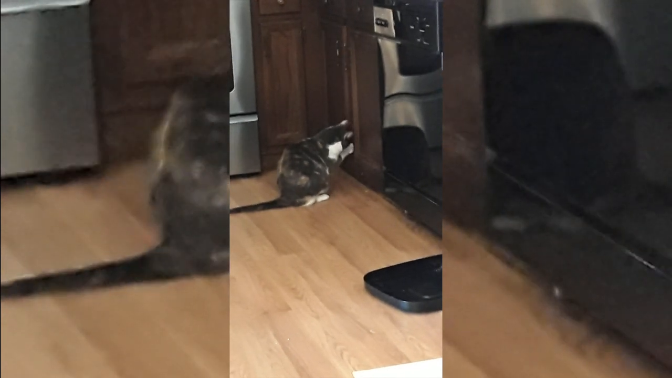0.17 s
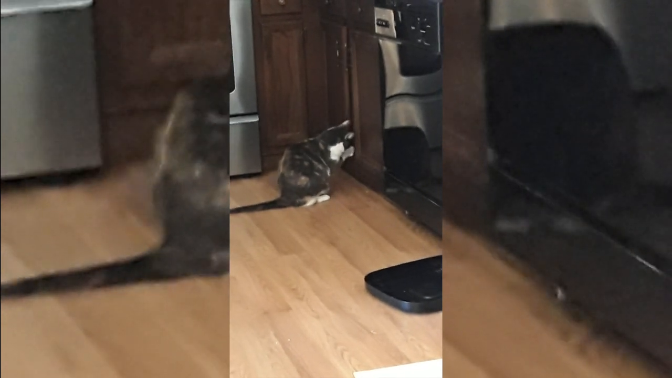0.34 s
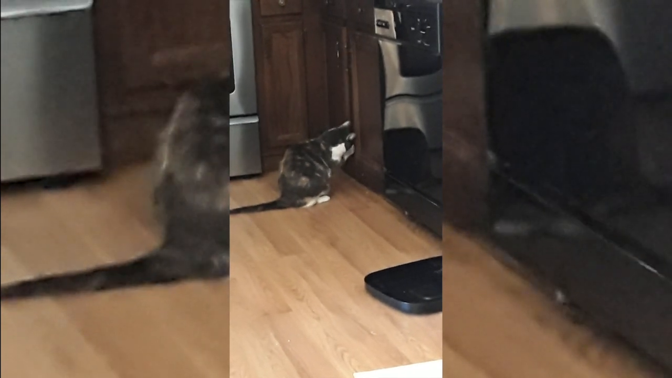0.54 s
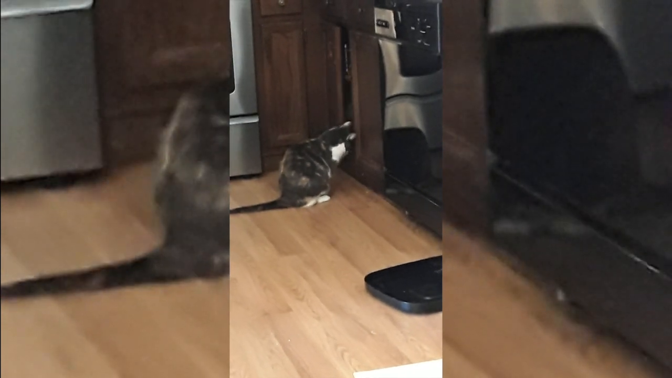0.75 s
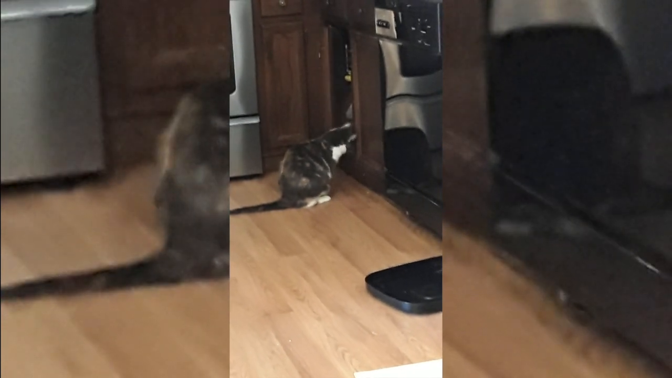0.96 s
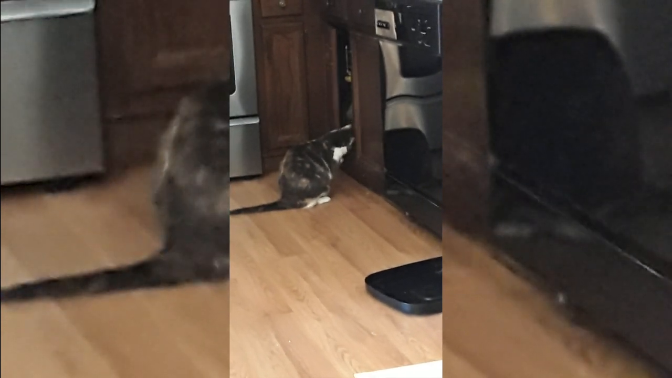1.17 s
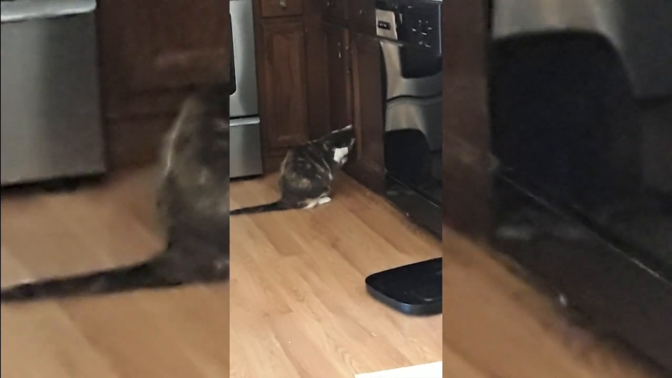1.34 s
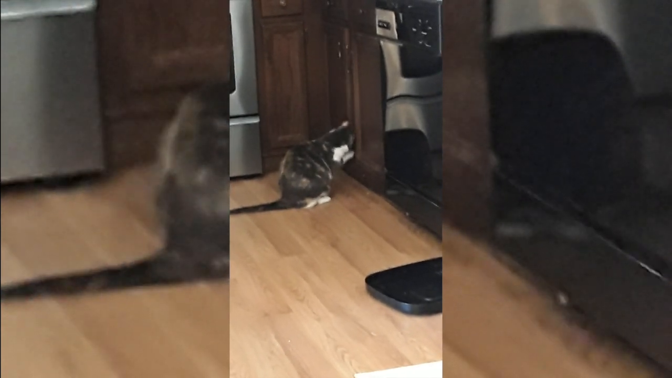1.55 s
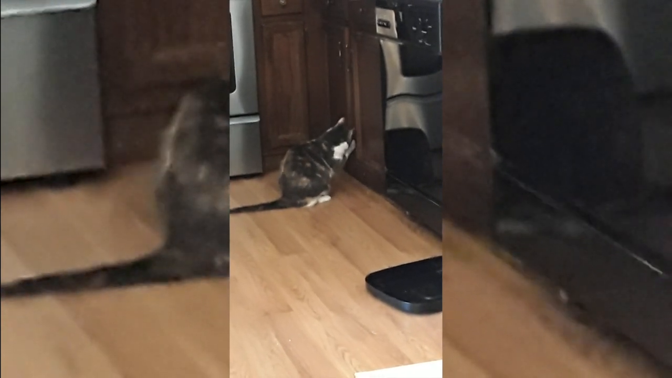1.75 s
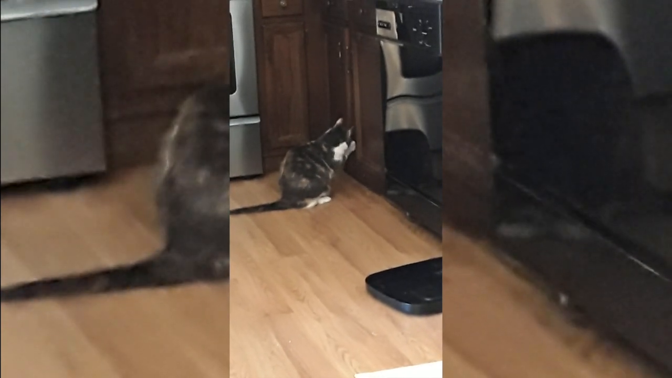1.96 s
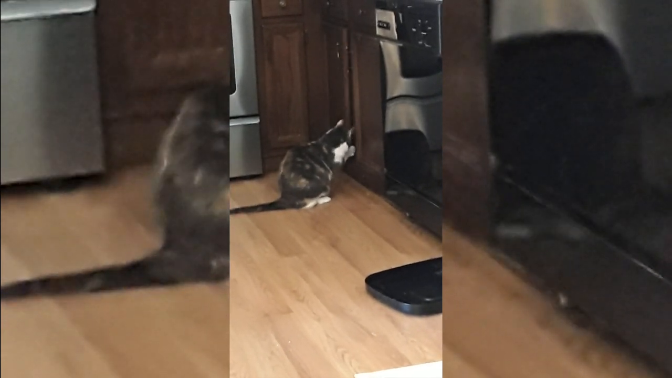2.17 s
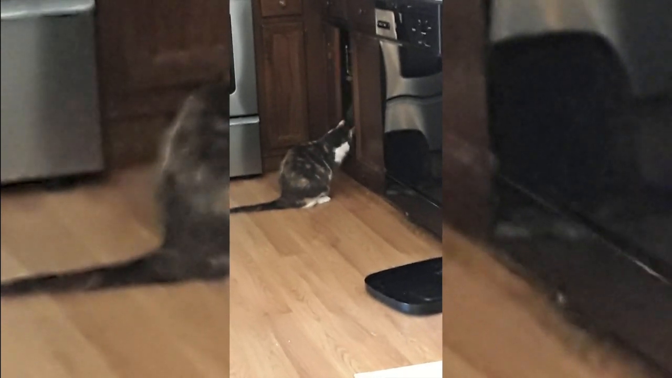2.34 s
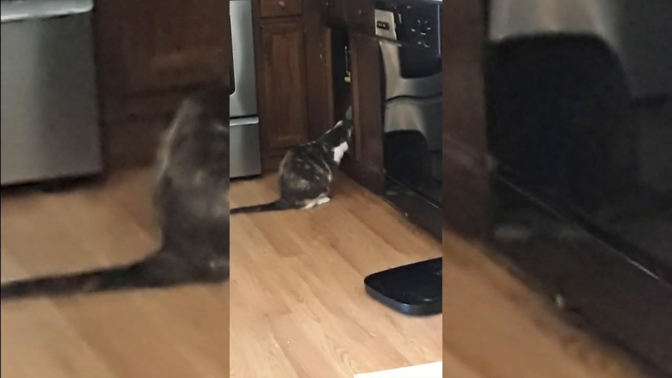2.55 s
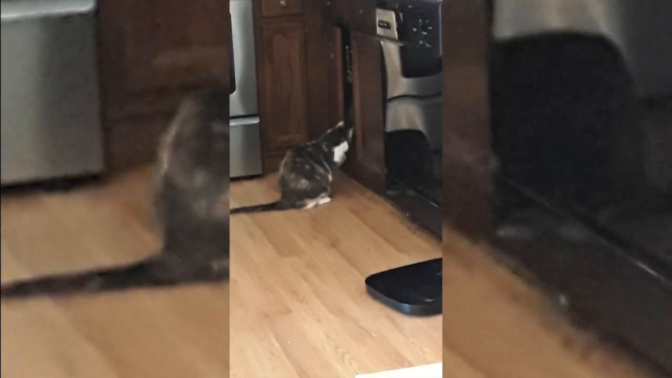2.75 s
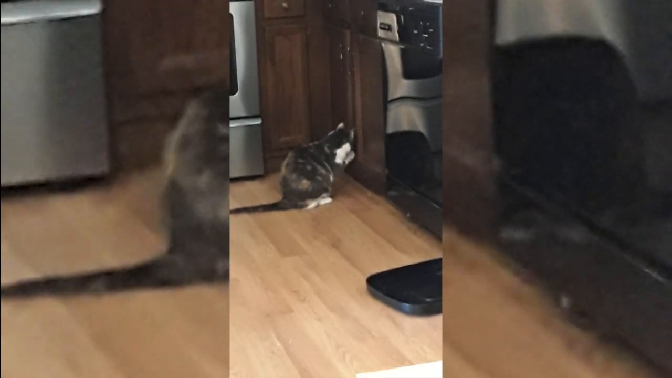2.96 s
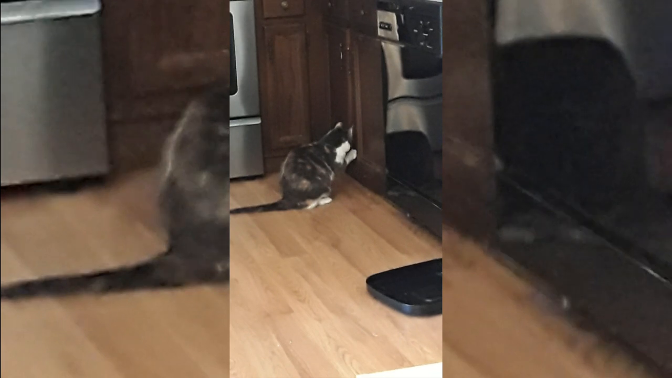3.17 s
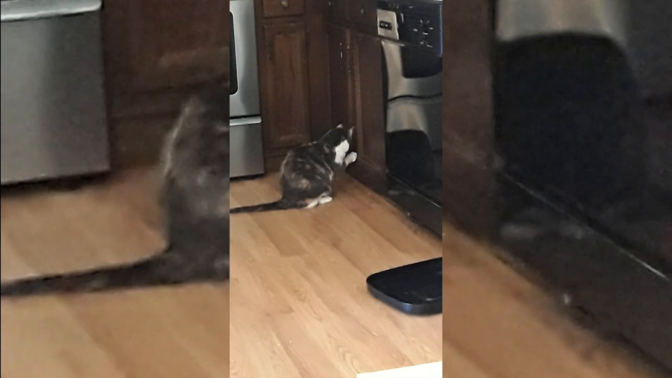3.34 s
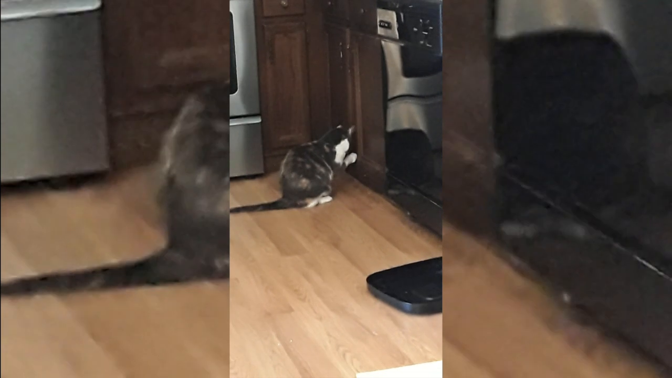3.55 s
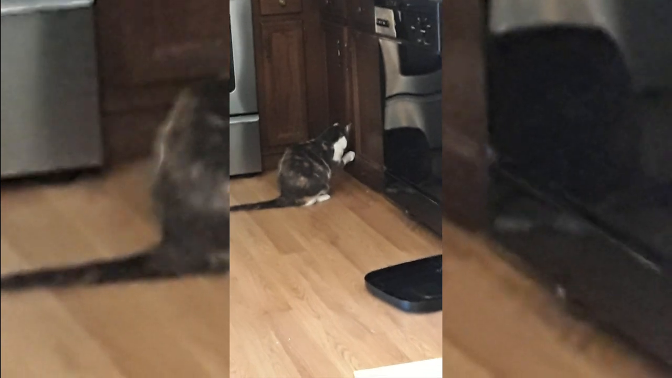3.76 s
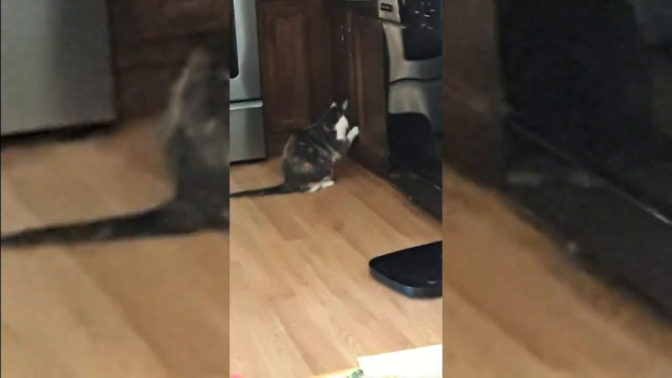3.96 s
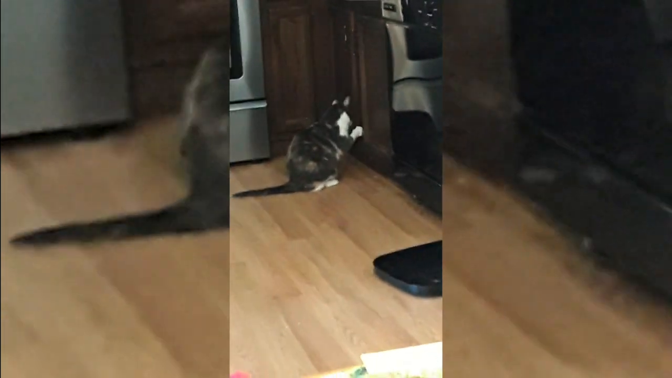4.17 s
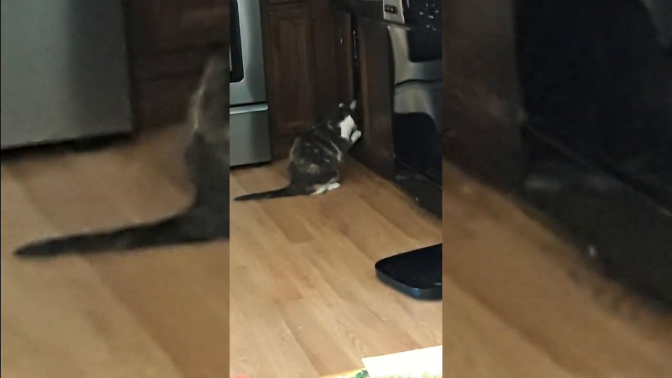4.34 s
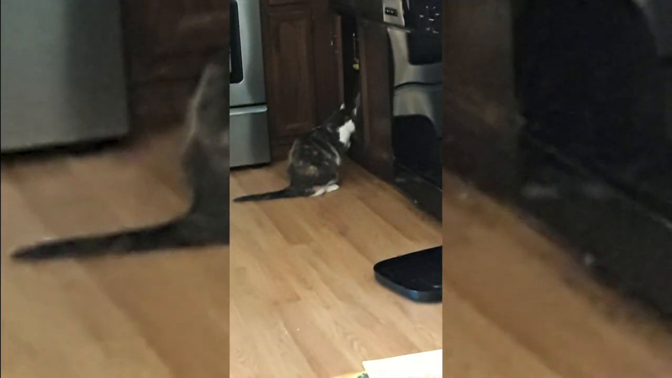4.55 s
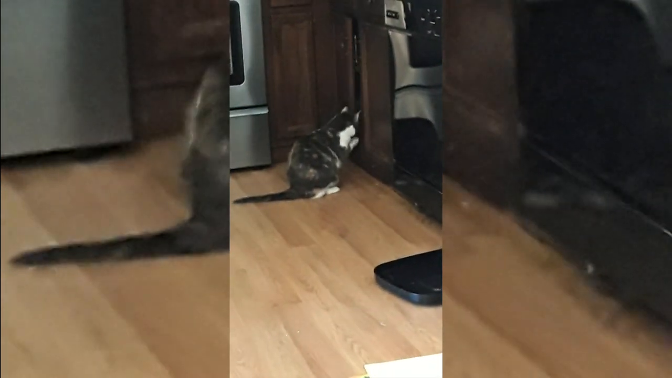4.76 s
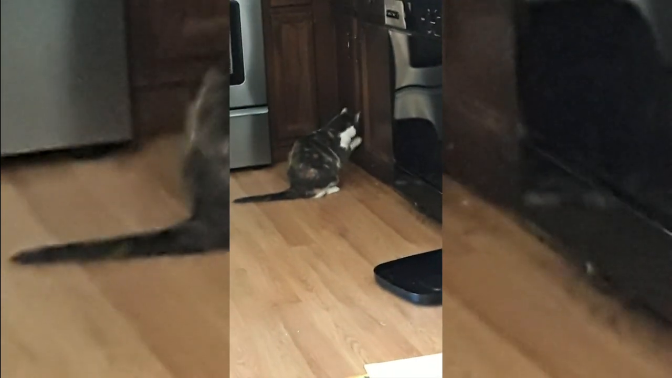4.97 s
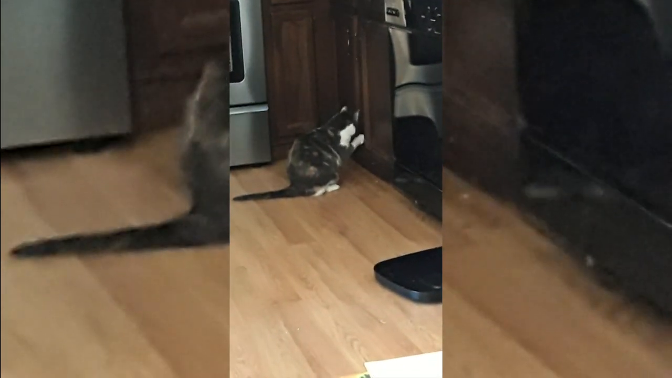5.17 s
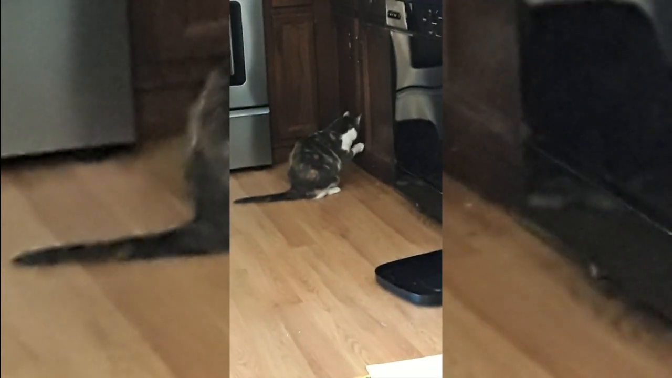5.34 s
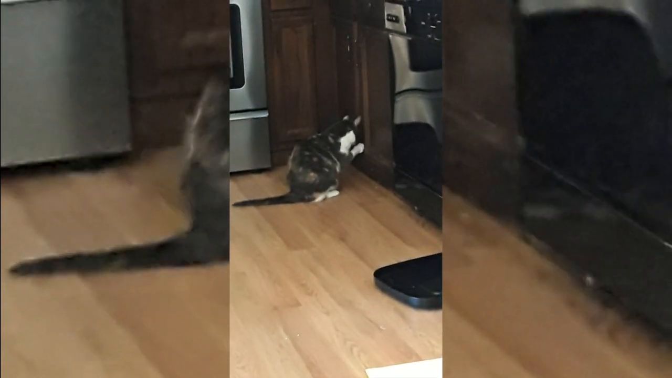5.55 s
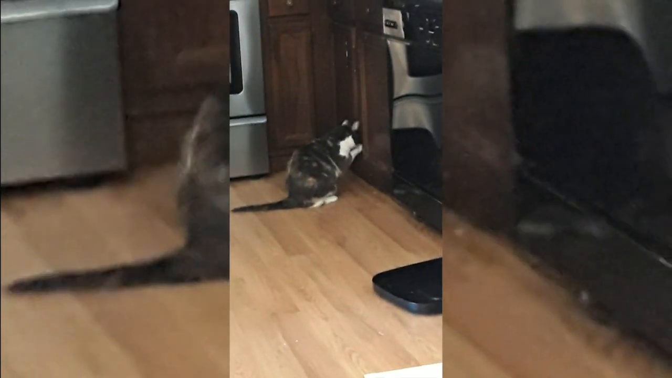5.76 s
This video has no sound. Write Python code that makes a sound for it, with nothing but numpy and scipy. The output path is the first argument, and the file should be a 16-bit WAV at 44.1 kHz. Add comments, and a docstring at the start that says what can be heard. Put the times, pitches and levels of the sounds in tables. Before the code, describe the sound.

A wooden cabinet door slams shut three times in a quiet kitchen, each slam followed by a weaker bounce and faint claw scuffs.

```python
"""In a kitchen, a cat paws a wooden cabinet door open three times; each time the sprung hinges slam it shut.
Every slam and its weaker rebounds are thuds plus cracks; a soft contact trades its crack for a hollow knock.
Claw scuffs and faint narrow-band ticks near 6.75 kHz are short runs of clicks through a resonance. All these are
convolved with one stereo response of door, cabinet and room: single modes over a dense ring of decaying noise bands.
Behind them lie an appliance's wavering low rumble and a thin hiss, both coloured noise."""
import sys
import numpy as np
from scipy import signal
from scipy.fft import rfft, irfft
from scipy.io import wavfile
from scipy.ndimage import uniform_filter1d

SR = 44100
rng = np.random.default_rng(int(sys.argv[2]) if len(sys.argv) > 2 else 0)


def transcribe(u):
    """Save the signal u as a 16-bit wav file named by the first command-line argument.

    u: samples, shape (n,) or (channels, n), limited to [-1, 1]; the rate is SR.
    q: integer samples, one column per channel.
    """
    v = np.clip(np.atleast_2d(u).T, -1, 1)
    q = np.round(v * 32767).astype(np.int16)
    wavfile.write(sys.argv[1], SR, q)


N = 256220

# background
RUMBLE_DB, HISS_DB = -53.5, -65.5
# dense ring; the early level excess fades over EARLY_S
WOOD_DB, EARLY_S = -12.5, .059
# high ticks: TICK_S is the length at TICK_REF_DB; it halves for every TICK_HALVING_DB above
TICK_HZ, TICK_WIDTH_HZ = 6750, 550
TICK_S, TICK_REF_DB, TICK_HALVING_DB = .04, -41, 5
FAINT_TICKS_PER_S, FAINT_TICK_DB = 1.5, -50
# contacts of the door with its frame
THUD_HZ, CRACK_TOP_HZ = 890, 11300
KNOCK_HZ, KNOCK_Q, KNOCK_DB = 840, 6.4, -6
FLIGHT_KEPT = .66  # each rebound lasts this share of the one before


def from_db(db):
    """Decibels to gain."""
    return 10 ** (np.asarray(db) / 20)


def at_hz(table, hz, axis=1):
    """One column of a table, read along log frequency."""
    table = np.array(table)
    return np.interp(np.log(np.maximum(hz, 1)), np.log(table[:, 0]), table[:, axis])


def coloured_noise(spectrum, width, size):
    """Mid and side noise with a given spectrum and stereo width; the mid has rms 1."""
    hz = np.linspace(0, SR / 2, size // 2 + 1)
    mid_gain = from_db(at_hz(spectrum, hz)) * (hz > 20)
    side_gain = mid_gain * from_db(at_hz(width, hz))
    phases = np.exp(2j * np.pi * rng.random((2, len(hz))))
    noise = irfft(phases * [mid_gain, side_gain], size)
    return noise / noise[0].std()


def left_right(mid_side):
    """Mid and side to two channels."""
    mid, side = mid_side
    return np.array([mid + side, mid - side])


def cut(x, hz, kind):
    """Second-order low- or high-pass."""
    sos = signal.butter(2, min(hz, SR * 9 / 20), kind, fs=SR, output="sos")
    return signal.sosfilt(sos, x)


def add(track, start_s, piece):
    """Lays a piece into a track."""
    i = max(round(start_s * SR), 0)
    track[i:i + len(piece)] += piece[:max(N - i, 0)]


def background(waver_db=1.0, waver_s=0.17):
    """A running appliance rumbles unevenly under a steady thin hiss; both are coloured stereo noise."""
    # noise spectra: (frequency [Hz], relative density [dB per Hz])
    rumble_spectrum = [(25, -25.5), (45, -21.5), (70, -15.5), (105, -9.5), (135, 2), (165, -7), (190, -5),
                       (255, -9.5), (295, -6), (410, -21.5), (750, -29.5), (1500, -40), (4000, -59.5)]
    hiss_spectrum = [(800, -13.5), (1500, -6.5), (2800, -8.5), (4000, -7.5), (6000, -9.5), (8200, -11.5),
                     (10500, -8.5), (12200, 1.5), (13500, -0.5), (15700, -8.5)]
    # stereo width: (frequency [Hz], side minus mid [dB])
    air_width = [(60, -19.5), (130, -29.5), (380, -14.5), (700, -11), (1300, -9), (8000, -7.5),
                 (14000, -10)]
    slow = uniform_filter1d(rng.standard_normal(N), size=int(waver_s * SR), mode="wrap")
    level_db = RUMBLE_DB + waver_db * slow / slow.std()
    rumble = from_db(level_db) * coloured_noise(rumble_spectrum, air_width, N)
    hiss = from_db(HISS_DB) * coloured_noise(hiss_spectrum, air_width, N)
    return left_right(rumble + hiss)


def steadied(x, size):
    """Evens out the swells of a noise band and roughly keeps its power."""
    power = uniform_filter1d(x ** 2, size, axis=-1, mode="wrap")
    mean_power = np.mean(x ** 2, axis=-1, keepdims=True)
    return x * np.sqrt(mean_power / (power + 1e-20))


def dense_ring(t, count=19):
    """Countless overlapping modes: each half octave builds up, has its own early level, then dies with the room."""
    # dense modes of door and room: (frequency [Hz], relative density [dB per Hz])
    wood = [(30, -27), (60, -14), (100, -11.5), (140, -1), (175, -1.5), (320, 4.5), (430, -3), (650, 0.5),
            (1100, -5), (2200, -5), (3800, -6.5), (5000, -9.5), (5800, -13), (7100, -11), (7800, -25),
            (9500, -26), (12000, -18.5), (15700, -27)]
    # growth and decay: (frequency [Hz], build-up [s], t60 [s], early excess [dB])
    decay = [(50, .003, .6, -5), (140, .018, .72, -3), (320, 0.016, .62, -3), (700, 0.013, 0.45, 0),
             (1400, 0.0019, 0.5, -1), (3000, 0.0046, 0.4, -1.5), (6516, 0.0042, 0.49, 1.5),
             (12000, .004, .38, 2.5)]
    # door in stereo: (frequency [Hz], side minus mid [dB], left minus right [dB])
    door_width = [(50, -30, -0.5), (120, -30.5, -0.5), (220, -24, -1.5), (380, -11.5, 0.05),
                  (700, -14.5, 0.5), (1200, -9, -1.45), (4000, -10, -0.96), (8000, -11, 1.05),
                  (14000, -8.5, 0.45)]
    spectrum = rfft(coloured_noise(wood, door_width, len(t)))
    bins_hz = np.linspace(0, SR / 2, spectrum.shape[1])
    centres_hz = np.geomspace(32, 16000, count)
    ring = 0
    for hz, share in zip(centres_hz, np.eye(count)):
        # triangular band on log frequency; neighbours sum to one
        band = irfft(spectrum * at_hz(np.c_[centres_hz, share], bins_hz), len(t))
        band = steadied(band, size=int(SR * max(5 / hz, .008)))
        build_s, t60_s, early_db = [at_hz(decay, hz, axis=column) for column in (1, 2, 3)]
        early = from_db(early_db * np.exp(-np.square(t / EARLY_S)))
        rising = (1 - np.exp(-t / build_s)) * early
        dying = np.exp(-np.log(1000) * t / t60_s)
        pan = from_db(at_hz(door_width, hz, axis=2) * np.array([[.5], [-.5]]))
        ring = ring + pan * left_right(band) * rising * dying
    return from_db(WOOD_DB) * ring


def door_response():
    """One sharp blow heard across the kitchen: modes swell as it spreads through the cabinet, peak and fade."""
    # strong modes of panel and cabinet; those of the enclosed air come later:
    # (frequency [Hz], peak [dB], delay [s], swell [s])
    modes = [(92, -31, .004, 0.032), (141, -20, 0.0032, 0.0058), (141.65, -15, 0.037, .014),
             (143.2, -36, .09, 0.036), (158, -29.5, 0.036, 0.014), (196.7, -25.5, 0.0031, 0.017),
             (237, -25.5, .048, .011), (265, -21, 0.01, .006), (322, -25, .012, .012),
             (370.4, -21, .014, .015), (495.8, -21, .004, 0.014), (520.4, -28.5, .010, 0.026),
             (601.5, -25.5, .036, 0.0091), (676.8, -29.5, 0.0034, 0.0066), (733.5, -23.5, 0.042, 0.0065),
             (775, -26, 0.018, 0.0077), (800, -25, 0.0033, 0.0075), (897, -33, .004, 0.014),
             (1391, -34.5, .020, 0.012), (1443, -37.5, 0.0051, 0.037), (1696, -28.5, 0.0065, 0.013),
             (2147, -28, .001, 0.013)]
    t = np.arange(SR * 3 // 2) / SR
    response = dense_ring(t)
    for hz, db, delay_s, swell_s in modes:
        age_s = np.maximum(t - delay_s, 0)
        envelope = age_s / swell_s * np.exp(1 - age_s / swell_s)  # peaks at 1 after swell_s
        response = response + from_db(db) * envelope * np.sin(2 * np.pi * hz * age_s)
    return response


def click_run(hz, width_hz, length_s, per_s=900):
    """A short fading run of tiny random clicks through one resonance."""
    t = np.arange(SR // 4) / SR
    struck = (rng.random(len(t)) < per_s / SR) | (t == 0)
    clicks = rng.standard_normal(len(t)) * struck * np.exp(-np.square(t / length_s))
    clicks = clicks / np.linalg.norm(clicks)
    edges_hz = np.clip([hz - width_hz / 2, hz + width_hz / 2], 200, 15000)
    return signal.sosfilt(signal.butter(2, edges_hz, "band", fs=SR, output="sos"), clicks)


def high_ticks():
    """Faint narrow-band ticks, some at random times; a stronger tick is over sooner."""
    # clearest high ticks: (time [s], strength [dB])
    clear = [(.01, -41.5), (.258, -42.5), (.766, -37), (2.08, -41.5), (2.337, -36.5), (3.958, -42),
             (4.119, -40.5), (4.435, -40.5), (5.227, -40), (5.391, -34.5)]
    force = np.zeros(N)
    faint_starts = np.flatnonzero(rng.random(N) < FAINT_TICKS_PER_S / SR)
    faint = [(i / SR, FAINT_TICK_DB) for i in faint_starts]
    for s, db in list(clear) + faint:
        length_s = TICK_S * .5 ** ((db - TICK_REF_DB) / TICK_HALVING_DB)
        add(force, s, from_db(db) * click_run(TICK_HZ, TICK_WIDTH_HZ, length_s))
    return force


def claw_scuffs():
    """Claws scrape the wood: each scuff is a run of stick-slip clicks."""
    # claws on the door edge: (time [s], strength [dB], centre [Hz], width [Hz], length [s])
    scuffs = [(.002, -41.5, 2680, 2600, 0.02), (.748, -43, 5060, 4360, .024),
              (1.058, -49, 4000, 2495, .003), (1.923, -48.5, 2700, 1502, 0.027),
              (3.945, -48, 4300, 3800, .046), (4.112, -43, 1850, 802, .04), (5.249, -52, 1900, 1400, .04),
              (5.392, -43, 3300, 4200, 0.058), (5.768, -46.5, 1900, 1500, .005)]
    force = np.zeros(N)
    for s, db, hz, width_hz, length_s in scuffs:
        add(force, s, from_db(db) * click_run(hz, width_hz, length_s))
    return force


def contacts():
    """The hinges pull the door back after every slam, in ever shorter, weaker rebounds: (s, thud dB, crack dB)."""
    # slams on the frame: (time [s], strength [dB], time until the door first falls back [s])
    slams = [(1.307, 1.3, .159), (2.828, .3, .1525), (4.799, 0, .134)]
    # rebounds after every slam, in order: (level re slam [dB], crack re thud [dB])
    rebounds = [(-8.5, -7.5), (-23, -9.5), (-32, -10.5)]
    # soft bumps of the loose door: (time [s], strength [dB], crack re thud [dB])
    bumps = [(1.638, -22, -18), (1.708, -24.5, -24), (5.243, -27.5, -40)]
    rows = list(bumps)
    for s, db, flight_s in slams:
        rows.append((s, db, 0))
        for k, (rebound_db, crack_db) in enumerate(rebounds):
            s = s + flight_s * FLIGHT_KEPT ** k
            rows.append((s, db + rebound_db, crack_db))
    return rows


def blows():
    """Each contact is a dull thud plus a crack; a slow rebound presses softly, so a hollow knock replaces the crack."""
    click = signal.unit_impulse(SR // 20)
    thud = cut(click, THUD_HZ, "low")
    crack = -cut(click, THUD_HZ, "high")
    knock = signal.lfilter(*signal.iirpeak(KNOCK_HZ, KNOCK_Q, fs=SR), thud)
    force = np.zeros(N)
    for s, thud_db, crack_db in contacts():
        hardness = min(from_db(crack_db), 1)
        sharp = hardness * cut(crack, hardness * CRACK_TOP_HZ, "low")  # softer is also duller
        hollow = (1 - hardness) * from_db(KNOCK_DB) * knock
        add(force, s, from_db(thud_db) * (thud + sharp + hollow))
    return force


def scene():
    """Blows, scuffs and ticks all sound through the same wood and the same room."""
    quiet = background()
    response = door_response()
    force = high_ticks() + claw_scuffs() + blows()
    return signal.fftconvolve(force[None], response, axes=1)[:, :N] + quiet


def record(dry, top=1.2):
    """The highest peaks are rounded and the highest treble is cut steeply."""
    low_pass = signal.ellip(12, .1, 80, 15950, fs=SR, output="sos")  # ripple, stopband [dB]; cutoff [Hz]
    return signal.sosfilt(low_pass, top * np.tanh(dry / top))


dry = scene()
out = record(dry)
transcribe(out)
```